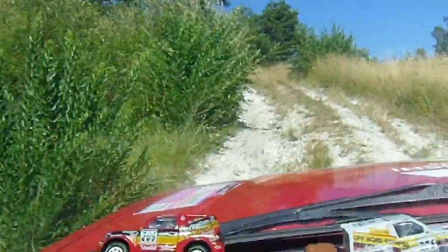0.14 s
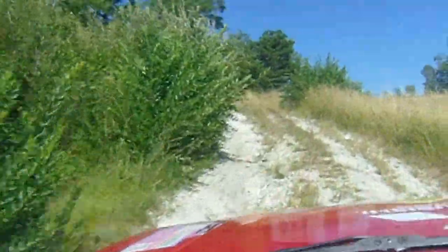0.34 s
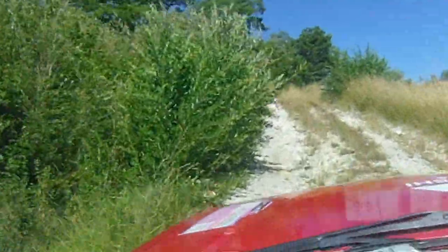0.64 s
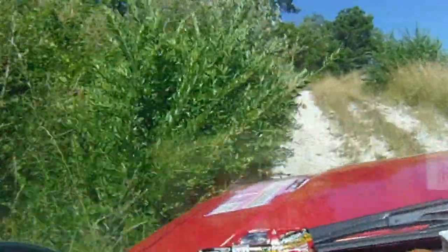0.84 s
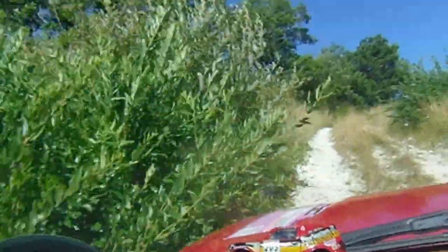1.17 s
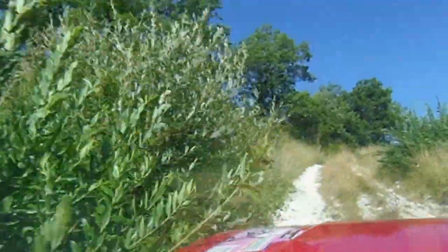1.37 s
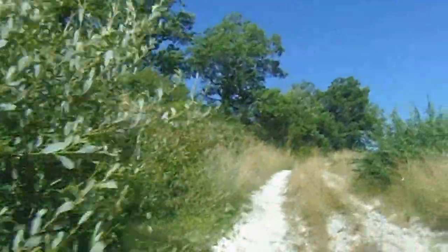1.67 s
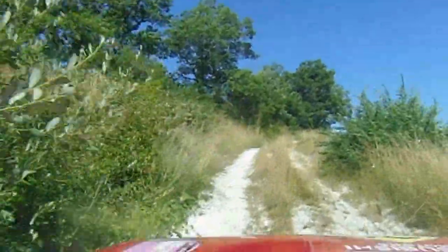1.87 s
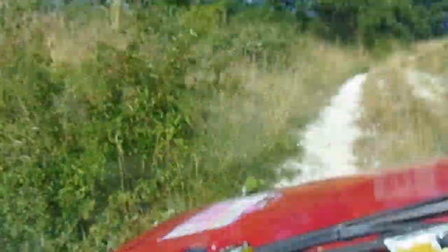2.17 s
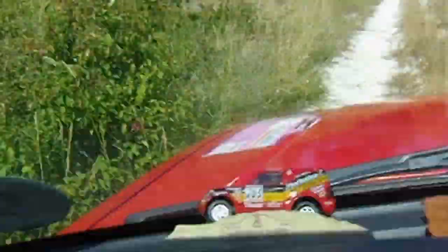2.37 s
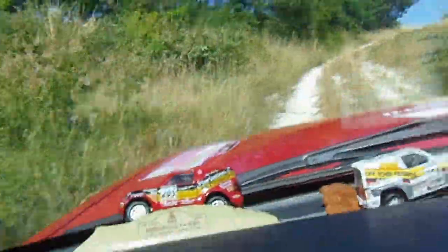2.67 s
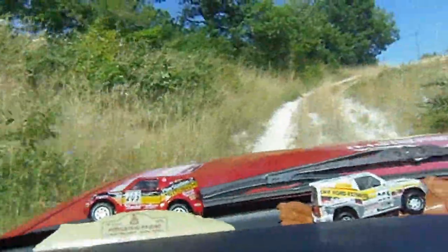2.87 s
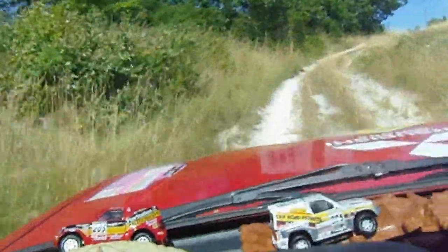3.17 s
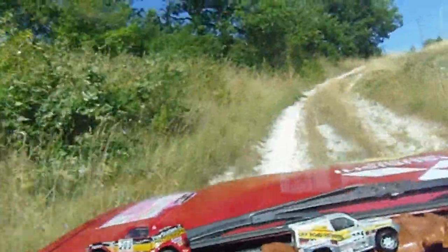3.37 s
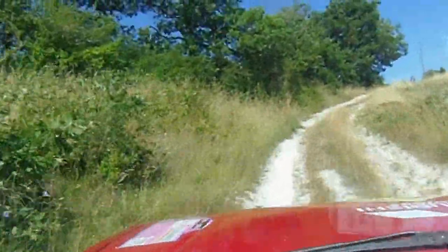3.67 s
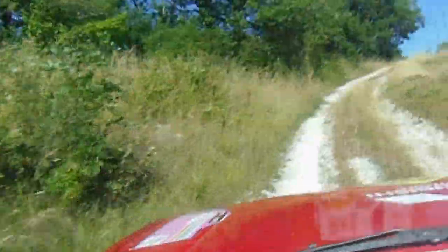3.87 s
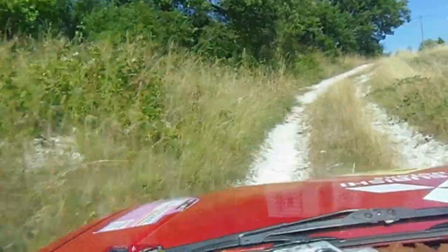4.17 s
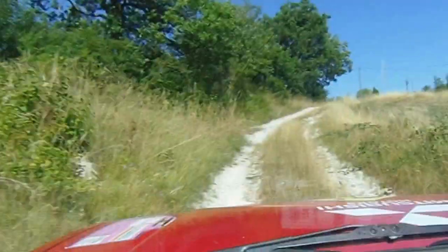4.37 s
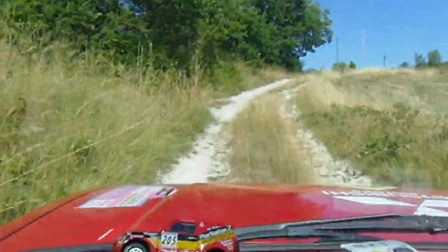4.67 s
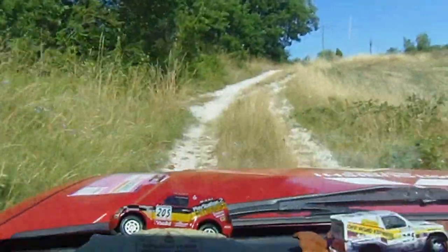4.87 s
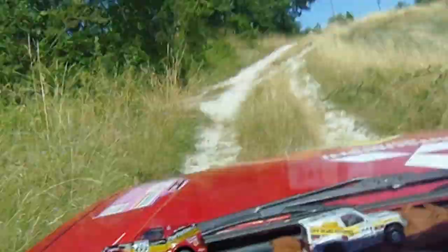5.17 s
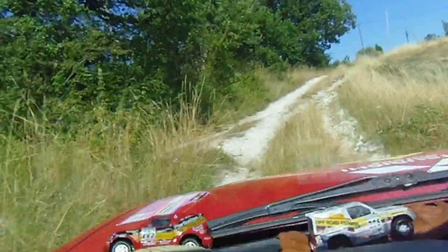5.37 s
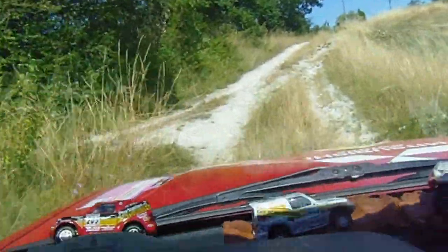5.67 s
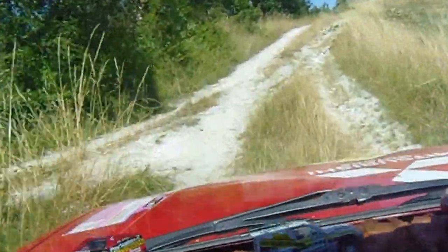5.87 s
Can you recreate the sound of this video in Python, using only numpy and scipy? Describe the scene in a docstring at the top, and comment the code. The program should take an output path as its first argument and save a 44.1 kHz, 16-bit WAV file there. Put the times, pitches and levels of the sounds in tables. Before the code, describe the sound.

Heard from inside the cab of an off-road vehicle on a rough track: a droning engine rises in pitch unevenly while deep body boom and shudder swell with every rut. Loose plastic knocks in clusters early and again midway, with dull floor thumps, fine rattles and tiny squeaks. Later the load eases, the drone softens and only light taps and small knocks remain. The sound is close, dry and single-channel.

```python
"""Inside the cab of a six-cylinder four-wheel drive climbing a rutted track. The body booms as a drifting
low mode and shudders as low noise, both raised by each rut. The exhaust hums as a harmonic series at multiples
of half the firing rate. Loose trim rattles as filtered noise, knocks as noise bursts with ringing modes, and
squeaks as short wavering tones; a clip taps as decaying noise and the floor thumps as decaying tones.
On top of the sounds in the cab lie faint clicks, each a sudden jump of the waveform that sinks back."""
import sys
import numpy as np
from scipy.fft import rfft, irfft, next_fast_len
from scipy.io import wavfile
from scipy.ndimage import uniform_filter1d, map_coordinates

SR = 44100
rng = np.random.default_rng(int(sys.argv[2]) if len(sys.argv) > 2 else 0)


def transcribe(signal):
    """Save signal, clipped to [-1, 1], as a 16-bit WAV file at the path in sys.argv[1]."""
    frames = np.atleast_2d(signal).T
    limited = np.clip(frames, -1, 1)
    pcm = np.round(limited * 32767).astype(np.int16)
    wavfile.write(sys.argv[1], SR, pcm)


N = 266364


def amp(db):
    """Decibel law: level to amplitude gain."""
    return 10 ** (np.asarray(db) / 20)


def unit(x):
    """Normalisation to an rms of 1."""
    return x / np.sqrt(np.mean(x ** 2) + 1e-20)


def curves(rows):
    """Linear interpolation over time: one value per sample for each column after the time."""
    s, *columns = np.transpose(rows)
    return [np.interp(np.arange(N) / SR, s, column) for column in columns]


def wobble(rate):
    """Smooth random modulation: a spline through normal deviates, rate knots a second."""
    knots = rng.standard_normal(int(N * rate / SR) + 4)
    return map_coordinates(knots, [np.arange(N) * rate / SR])


def filtered(x, response):
    """Linear filtering: the spectrum is multiplied by a response of frequency."""
    m = next_fast_len(N + SR // 2)
    return irfft(rfft(x, m) * response(np.fft.rfftfreq(m, 1 / SR)), m)[:N]


def coloured(x, points):
    """Spectral shaping through (Hz, dB) points on a log frequency axis, to rms 1."""
    hz, db = np.transpose(points)
    return unit(filtered(x, lambda f: amp(np.interp(np.log(f + 1), np.log(hz + 1), db))))


def noise():
    """White noise: equal mean power at every frequency."""
    return rng.standard_normal(N)


def even(x, seconds):
    """Gain levelling: swings slower than seconds are reduced, as in a steadily driven panel."""
    power = np.abs(uniform_filter1d(x ** 2, int(seconds * SR)))
    return unit(x / np.sqrt(power + 0.023))


def add_at(out, s, burst):
    """Superposition: adds a burst to out from time s."""
    out[round(s * SR):][:len(burst)] += burst


# Roughness of the track: start_s [s], thud_db [dB], drone_db [dB], rattle_db [dB]
TRACK_ROUGHNESS = [(0.0, -29, -49.5, -69.5), (0.4, -30, -46.5, -69), (0.93, -27, -44, -62.5),
                   (1.13, -29, -45, -70), (1.23, -34.5, -50.5, -70), (1.66, -37, -47, -66),
                   (1.82, -37, -50.5, -67), (2.4, -40.5, -54, -69), (2.8, -39, -52.5, -70.5),
                   (3.46, -35, -51.5, -70.5), (3.5, -31, -48.5, -71), (3.77, -35, -50, -68),
                   (4.17, -40.5, -55, -75.5), (5.1, -40.5, -54.5, -73.5), (5.43, -41.5, -56, -73.5),
                   (5.5, -39, -54, -73.5), (6.04, -40, -56.5, -74.5)]


def roughness():
    """Forced excitation: the track sets the levels of thud, drone and rattle."""
    return curves(TRACK_ROUGHNESS)


# Spectrum of the thin hiss: frequency_hz [Hz], relative level_db [dB per Hz]
HISS_SPECTRUM = [(1470, -27), (2500, -5.5), (3390, -5.5), (4500, -12), (8560, -12.5), (14200, -15.5),
                 (15600, -29)]
HISS_DB = -3  # against the smoothed rattle level, at the start
HISS_FADE_DB_PER_S = 0.94


def hiss():
    """Broadband noise: its level follows the smoothed rattle level and fades steadily against it."""
    rattle_db = roughness()[2]
    fade_db = HISS_FADE_DB_PER_S * np.arange(N) / SR
    hiss_db = HISS_DB + uniform_filter1d(rattle_db, SR // 2) - fade_db
    return amp(hiss_db) * coloured(noise(), HISS_SPECTRUM)


# Faint clicks on top of the cab's sound, small jumps of the waveform: start_s [s], level_db [dB peak]
CLICK_STEPS = [(0.444, -39), (0.972, -38.5), (1.1, -31.5), (1.116, -38), (1.132, -31.5), (1.516, -37.5),
               (1.533, -38.5), (2.156, -38.5), (2.172, -39.5), (3.82, -31.5), (3.852, -40.5),
               (3.869, -39.5), (5.964, -46.5)]
CLICK_S = 0.0033  # time constant of the decay


def clicks():
    """Step and relaxation: each click is a sudden jump of either sign that sinks back exponentially."""
    out, t = np.zeros(N + SR), np.arange(SR // 20) / SR
    for s, db in CLICK_STEPS:
        add_at(out, s, rng.choice([-1, 1]) * amp(db) * np.exp(-t / CLICK_S))
    return out[:N]


# Taps of a loose clip: start_s [s], level_db [dB, before the common trim]
CLIP_TAPS = [(4.0392, -53.5), (4.14, -58), (4.3498, -58), (4.408, -57), (4.4667, -53), (4.4956, -56),
             (4.5248, -56), (4.5761, -59.5), (4.7566, -59), (4.9212, -56), (4.9639, -56), (5.0097, -56),
             (5.0559, -65), (5.1731, -55), (5.3703, -59), (5.5194, -62), (5.5696, -59)]
CLIP_SPECTRUM = [(700, -30.5), (2300, -1.5), (5500, -12), (12000, -25.5)]
TAP_T60_S = .03


def taps():
    """Light impact: a loose clip of thin plastic gives short bursts of decaying noise."""
    shape, t = np.zeros(N + SR), np.arange(SR // 20) / SR
    rise = 1 - np.exp(-t / 0.0016)
    for s, db in CLIP_TAPS:
        add_at(shape, s, amp(db - 3.5 - 60 * t / TAP_T60_S) * rise)
    return shape[:N] * coloured(noise(), CLIP_SPECTRUM)


# Rubbing trim: start_s [s], pitch_hz [Hz], level_db [dB, before a common gain], length_s [s, before stretching]
TRIM_SQUEAKS = [(0.744, 5160, -66, 0.013), (1.288, 5780, -58.5, 0.0058), (1.384, 5692, -64, 0.011),
                (1.656, 5910, -53, 0.0054), (1.987, 5680, -70, 0.0092), (2.054, 5500, -66, 0.0094),
                (2.353, 5650, -72, 0.018), (2.48, 5700, -73, 0.013), (3.518, 8560, -64, 0.013),
                (3.543, 2540, -51, 0.0079), (3.558, 8520, -63, 0.0094), (3.559, 4400, -64, 0.018),
                (3.563, 9960, -60, 0.0083), (3.581, 8890, -50.5, .008), (3.585, 10400, -61.5, 0.014),
                (3.615, 7900, -67, .008), (3.631, 8630, -68, 0.0075), (3.643, 4700, -67, 0.01),
                (3.649, 8940, -61.5, 0.0067), (3.722, 5740, -73, 0.015), (3.939, 5660, -63.5, 0.014),
                (4.364, 5680, -73.5, 0.019), (5.231, 2342, -69.5, 0.0064), (5.288, 2340, -66, 0.0056)]
SQUEAK_WAVER = 0.047  # radians a sample up to 6 kHz, more for higher squeaks


def squeaks():
    """Stick-slip friction: brief tones that start sharply and waver in pitch."""
    out = np.zeros(N)
    for s, hz, db, length in TRIM_SQUEAKS:
        t = np.arange(int(1.87 * length * SR)) / SR
        waver = np.cumsum(rng.normal(0, SQUEAK_WAVER * max(hz / 6000, 1) ** 2, len(t)))
        envelope = np.sin(np.pi * (t / t[-1]) ** 0.45)  # peaks early
        add_at(out, s, 1.75 * amp(db) * envelope * np.sin(2 * np.pi * hz * t + waver))
    return out


# Spectrum of the rattling trim, before dull and bright parts are split: frequency_hz [Hz], level_db [dB per Hz]
TRIM_SPECTRUM = [(300, -93.5), (1100, 0.5), (1800, -3.5), (2300, -3), (2800, -4), (4000, -6), (6000, -11),
                 (10000, -18.5), (15000, -29.5)]
GRAIN_DB = 1.2  # gravel under the tyres roughens drone and rattle


def rattle(swing):
    """Repeated small contacts, dull or bright: one at each swing of the body, more at random."""
    swings = np.flatnonzero(np.diff(np.floor(swing)))
    start = np.append(swings, rng.integers(0, N, size=600))
    size, bright, lasting = rng.random((len(start), 3)).T
    t = np.arange(SR // 20) / SR
    t60 = 0.012 + 0.031 * lasting[:, None]
    puffs = amp(-4 * np.log(1 - .9 * size[:, None]) - 60 * t / t60)
    place = start[:, None] + np.arange(len(t))

    def shake(share):
        """Superposition of all contacts, weighted by share, over a steady floor."""
        weighted = (share[:, None] * puffs).ravel()
        return .62 + .55 * np.bincount(place.ravel(), weighted, N)[:N]

    source = coloured(noise(), TRIM_SPECTRUM)
    dull = filtered(source, lambda f: 1 / (1 + (f / 3500) ** 2))
    trim = unit(shake(1.2 - bright) * dull + shake(2.5 * bright ** 2) * (source - dull))
    return amp(roughness()[2] + GRAIN_DB * wobble(250)) * trim


# Blows of loose plastic: start_s [s], level_db [dB, before band trims],
# low_db and bright_db [dB, low and bright bands against level_db]
PLASTIC_BLOWS = [(0.295, -51.5, -16, -7.5), (0.3497, -47, 0, -1), (0.441, -44, 1, -9),
                 (0.4858, -35.5, -3, -16.5), (0.853, -45.5, 7, -3), (0.8978, -47, -17, -3.5),
                 (0.9965, -43, -4, -1.5), (1.0322, -41.5, 0, -5.5), (1.076, -38.5, -5, -5.5),
                 (1.0877, -40.5, -5, -16), (1.131, -46, -7, -10), (1.1776, -51, -21, -4),
                 (1.485, -44.5, -5, -7), (1.5458, -31, -3.5, 0.5), (1.5921, -29.5, 1.5, -8.5),
                 (1.6, -41, 1, -15), (1.608, -43.5, 2, -8), (1.615, -46, 3, 9), (1.783, -47.5, -1, -1),
                 (1.8036, -44.5, -5, 4.5), (2.0356, -52, -9, 0), (2.798, -53.5, -5, -4),
                 (3.1465, -54, 8.5, -14.5), (3.1641, -44.5, -4, 4.5), (3.207, -45.5, 4.5, -5),
                 (3.2507, -47.5, 3, -33), (3.5, -47, 3, -1.5), (3.5204, -46, -5, -22),
                 (3.506, -55, -3, -11), (3.5336, -35, -3.5, -1), (3.541, -46.5, 5, 1),
                 (3.5463, -43.5, 5, -5), (3.553, -41, -9, -5), (3.5833, -44, 2, -5.5),
                 (3.588, -46.5, -6, 2), (3.5975, -47, -7, -4.5), (3.615, -48, 5.5, -5),
                 (3.6556, -44, -8, -22), (3.7003, -46.5, -20, -9.5), (3.752, -50.5, -7.5, -3.5),
                 (3.984, -53, 5.5, -5), (5.2634, -56.5, 12.5, -12), (5.609, -55, 4, -6.5),
                 (5.6585, -47.5, 3, -8.5), (5.6743, -49, 3, -10), (5.692, -54, 0, -15),
                 (5.7103, -51.5, 3, -23), (5.783, -52, 7, -1.5), (5.8193, -52.5, -5, -10),
                 (5.894, -55, 6, -6), (5.968, -58, -7, -4), (5.9817, -52, -16, -14.5),
                 (6.0207, -50, -12, -13)]
# Modes of the hollow dashboard: frequency_hz [Hz, before detuning], relative level_db [dB], t60_s [s]
HOLLOW_MODES = [(650, 2.5, 0.062), (727, -2, 0.067), (820, -1.5, 0.046), (1068, -0.5, 0.026),
                (1410, -7, 0.096)]
# Modes of its hard skin: frequency_hz [Hz, before detuning], relative level_db [dB], t60_s [s]
SKIN_MODES = [(1590, -4, .045), (1735, -10, 0.036), (1990, -1.5, .03), (2220, -5.5, 0.05),
              (2470, 1.5, 0.023), (3130, -6.5, 0.015), (3333, 0, 0.023), (3940, -7, 0.018),
              (4760, -2, 0.022)]
KNOCK_T60_S = 0.044 * np.array([[1.4], [1], [.8]])  # low, middle, bright band
DETUNE = .03  # relative spread: each blow lands elsewhere and shifts the modes
HOLLOW_GROWS = 1.4  # dB of the hollow ring per dB of the blow's low part


def ringing(modes, t):
    """Modal synthesis: a sum of decaying sines, scattered in level and pitch at each blow."""
    total = np.zeros(len(t))
    for hz, level, t60 in modes:
        gain = amp(level + rng.normal(0, 2.1) - 60 * t / t60)
        phase = 2 * np.pi * hz * rng.normal(1, DETUNE) * t + rng.uniform(0, 2 * np.pi)
        total += gain * np.sin(phase)
    return total


def knocks():
    """Impact excitation: a ragged noise burst in three bands, with the dashboard's modes ringing."""
    # low, middle, bright: (Hz, relative dB)
    bands = [[(250, -39), (650, -1.5), (1300, -4.5), (4000, -90.5)],
             [(600, -97.0), (1600, 0.0), (2500, -2.5), (4500, -5.5), (12000, -62.5)],
             [(2000, -81.0), (5500, -3.5), (9500, -10.5), (12500, -12.0), (15500, -19)]]
    shape, ring, t = np.zeros((3, N + SR)), np.zeros(N + SR), np.arange(SR // 5) / SR
    rise = 1 - np.exp(-t / .0024)
    decay = amp(-60 * t / KNOCK_T60_S) + 0.048 * amp(-60 * t / 0.36)  # with a faint longer tail
    for s, db, low_db, bright_db in PLASTIC_BLOWS:
        here = slice(round(s * SR), round(s * SR) + len(t))
        band_db = [[db + low_db - 2.5], [db - 1.5], [db + bright_db]]
        shape[:, here] += amp(band_db) * decay * rise
        hollow = amp(HOLLOW_GROWS * (db + low_db + 33) - 41.5) * ringing(HOLLOW_MODES, t)
        skin = amp(db - 9.5) * ringing(SKIN_MODES, t)
        ring[here] += (hollow + skin) * rise
    parts = [coloured(noise(), band) for band in bands]
    ragged = amp(-8.0 + 2.1 * wobble(600))
    return ring[:N] + ragged * (shape[:, :N] * parts).sum(axis=0)


# An axle meets its stop: start_s [s], level_db [dB, before rise and decay]
AXLE_BUMPS = [(.49, -32), (.69, -25), (0.991, -22), (3.49, -20)]
BUMP_HZ, BUMP_T60_S = 73.2, 0.2


def bumps():
    """Damped oscillation: a dull thump through the floor."""
    out, t = np.zeros(N + SR), np.arange(SR // 3) / SR
    rise = 1 - np.exp(-t / 0.0083)
    for s, db in AXLE_BUMPS:
        add_at(out, s, amp(db - 60 * t / BUMP_T60_S) * rise * np.sin(2 * np.pi * BUMP_HZ * t))
    return out[:N]


# Engine speed: start_s [s], pitch_hz [firings of one bank, Hz], level_db [dB rms of the 2nd multiple]
ENGINE_SPEED = [(0.0, 54.3, -42), (0.12, 60.12, -30.5), (0.25, 63.8, -37.5), (0.47, 65.18, -36.5),
                (0.54, 66.9, -39.5), (0.67, 71.34, -34), (0.78, 73.5, -34.5), (0.94, 73.75, -29.5),
                (1.13, 72.2, -40.5), (1.41, 79.5, -34.5), (1.65, 75.04, -43.5), (2.0, 80.2, -37),
                (2.25, 77.22, -43.5), (2.62, 83.85, -37.5), (2.86, 83.84, -38.5), (3.11, 89.07, -36.5),
                (3.4, 88.6, -37), (3.6, 95.6, -38), (3.78, 87.3, -42), (3.9, 93.9, -42), (4.16, 89.8, -43),
                (4.31, 93.65, -43), (4.54, 90.5, -40.5), (4.78, 91.83, -38.5), (4.96, 90.5, -40),
                (5.25, 91.85, -41.5), (5.43, 89.8, -44), (5.63, 90.56, -46.5), (5.8, 85.6, -53),
                (6.04, 85.3, -50)]
# Pull on the engine: start_s [s], load_db [dB against full load]
ENGINE_LOAD = [(0, -2), (1.1, 1.5), (1.4, -12.5), (1.55, -4.5), (2.0, -17.5), (2.5, -7), (3.6, -21),
               (4.45, -28.5), (4.75, -17.5), (5.55, -26), (5.8, -31), (6.04, -46)]
# Multiples at full load by engine speed: pitch_hz [firings of one bank, Hz], level_db [dB rms]
THIRD_MULTIPLE = [(54, -58), (60, -40), (63.5, -34.5), (66, -38.5), (72, -45), (75, -46), (79, -56.5),
                  (84, -52), (95, -53.5)]
FOURTH_MULTIPLE = [(54, -48), (66, -53), (72, -54), (75, -53), (78, -61.5), (81, -56), (84, -51),
                   (86, -51.5), (89, -51.5), (92, -64.5), (96, -52)]
FIFTH_MULTIPLE = [(54, -63), (64, -56.5), (70, -71), (77, -73.5), (84, -77.5), (89, -58.5), (91, -51.5),
                  (96, -58.5)]
# Growth of the 3rd, 4th and 5th multiples with load: growth [dB per dB]
LOAD_GROWTH = [0.9, 0.45, 0.43]
# Weak lines of uneven cylinders: multiple [of the firings of one bank], level_db [dB rms at full load]
UNEVEN_LINES = [(2 / 3, -43.5), (0.99, -48.5), (4 / 3, -52.5), (8 / 3, -57.5), (11 / 3, -62.5), (6, -68.5)]
FLUTTER_DB = 1.3  # the higher multiples come and go


def engine():
    """Harmonic series of the exhaust, slightly unsteady; uneven cylinders add weak lines that grow with load."""
    hz, level_db = curves(ENGINE_SPEED)
    load_db, = curves(ENGINE_LOAD)
    turn = 2 * np.pi * np.cumsum(hz) / SR + 0.081 * wobble(30)

    def tone(multiple, db):
        """A sine of the given rms level, locked to the engine's phase."""
        gain = np.sqrt(2) * amp(db + 0.12 * wobble(25))
        return gain * np.sin(multiple * turn + rng.uniform(0, 2 * np.pi))

    hum = tone(2, level_db)
    tables = [THIRD_MULTIPLE, FOURTH_MULTIPLE, FIFTH_MULTIPLE]
    for multiple, (table, growth) in enumerate(zip(tables, LOAD_GROWTH), start=3):
        full_load_db = np.interp(hz, *np.transpose(table))
        hum += tone(multiple, full_load_db + growth * load_db + FLUTTER_DB * wobble(11))
    for multiple, db in UNEVEN_LINES:
        hum += tone(multiple, db + 0.57 * load_db)
    return hum, turn


# Spectrum of the drone: frequency_hz [Hz], relative level_db [dB per Hz]
DRONE_SPECTRUM = [(120, -10), (210, -2.5), (238, -7.5), (315, -8.5), (364, -12), (590, -20.5), (635, -16.5),
                  (690, -24), (745, -20.5), (800, -26.5), (869, -26.5), (964, -25), (2500, -38.5),
                  (3250, -65.5), (5500, -120)]


def drone(turn):
    """Amplitude modulation: the engine's firing pulses in a noise drone."""
    firing = 1 + 0.17 * np.cos(2 * turn)
    drone_db = roughness()[1] + 0.78 * wobble(13) + GRAIN_DB * wobble(120)
    return amp(drone_db) * coloured(firing * noise(), DRONE_SPECTRUM)


# Spectrum of the thud: frequency_hz [Hz], relative level_db [dB per Hz]
THUD_SPECTRUM = [(30, -8.5), (50, 10.5), (80, -2), (120, -4.5), (200, -11), (260, -41), (400, -89.5),
                 (700, -130)]
THUD_WITH_SHUDDER = 0.09  # dB per dB


def thud(shudder_gain):
    """Low-frequency noise, driven by the track's roughness and slightly by the shudder."""
    thud_db = roughness()[0] + 1.4 * wobble(9.3)
    gain = amp(thud_db) * (shudder_gain / shudder_gain.mean()) ** THUD_WITH_SHUDDER
    return gain * even(coloured(noise(), THUD_SPECTRUM), seconds=0.17)


# A wheel works through a rut: start_s [s], end_s [s], boom_db [dB], shudder_db [dB, before a common trim]
WHEEL_RUTS = [(0.077, 0.158, -43, -22.5), (0.186, 0.289, -21.5, -24.5), (0.359, 0.453, -13.5, -22),
              (0.439, 0.619, -18, -18.5), (0.654, 0.75, -28, -25.5), (0.785, 0.904, -15, -23),
              (0.921, 1.015, -12.5, -23.5), (1.038, 1.151, -10, -30), (1.164, 1.37, -24, -35),
              (1.389, 1.478, -15, -24), (1.47, 1.581, -12.5, -27.5), (1.643, 1.751, -18, -15.5),
              (1.842, 2.092, -17.5, -24), (2.092, 2.196, -12, -22.5), (2.325, 2.687, -21, -30.5),
              (2.751, 2.85, -51, -26.5), (2.992, 3.281, -23.5, -32), (3.317, 3.464, -24, -40.5),
              (3.51, 3.605, -15.5, -19), (3.664, 3.763, -13.5, -23), (3.77, 3.91, -11, -29.5),
              (3.935, 4.158, -19.5, -28), (4.169, 4.547, -27.5, -31), (4.804, 5.047, -22.5, -37.5),
              (5.184, 5.33, -21.5, -38.5), (5.463, 5.576, -19.5, -26), (5.592, 5.831, -18.5, -24),
              (5.879, 6.031, -22.5, -41)]
CALM_DB, CALM_SHUDDER_DB = -30.5, -31.5  # boom and shudder between ruts
EDGE_S = 0.047  # rise and fall of a rut


def ruts():
    """Power addition: each rut rises, holds and falls over a calm level of boom and shudder."""
    t = np.arange(N) / SR
    power = amp(2 * np.array([[CALM_DB], [CALM_SHUDDER_DB]])) * np.ones(N)
    for start, end, *levels_db in WHEEL_RUTS:
        shape = np.clip(np.minimum(t - start, end - t) / EDGE_S + .5, 0, 1) ** 2
        power = power + amp(2 * np.array(levels_db))[:, None] * shape
    return np.sqrt(power)


# Spectrum of the shudder: frequency_hz [Hz], relative level_db [dB per Hz]
SHUDDER_SPECTRUM = [(5, -3), (9, -2), (14, -3), (22, 3.5), (29, 8.5), (38, 7), (50, -6.5), (70, -20.5),
                    (100, -70), (160, -130)]


def shudder(shudder_gain):
    """Forced vibration: ruts shake the panels, heard as levelled low noise."""
    return amp(0.5) * shudder_gain * even(coloured(noise(), SHUDDER_SPECTRUM), seconds=0.11)


# Lowest mode of cab air and body: start_s [s], pitch_hz [Hz, before random drift]
BOOM_PITCH = [(0, 19), (0.3, 19), (0.45, 21.5), (0.9, 20.5), (1.1, 19), (1.5, 20), (1.9, 20), (2.15, 18.5),
              (2.6, 19.5), (3.2, 20), (3.4, 17), (3.55, 19.5), (3.85, 19), (4.3, 18.5), (4.95, 18),
              (5.3, 21), (5.5, 20), (5.72, 23), (5.9, 16.5), (6.04, 15.7)]
DRIFT_HZ = 0.901  # scale of the random drift


def body_swing():
    """Phase accumulation: cycles of the lowest mode, its pitch drifting at random."""
    return np.cumsum(curves(BOOM_PITCH)[0] + DRIFT_HZ * wobble(12)) / SR


def boom(swing, boom_gain):
    """Cavity resonance: the cab booms at its lowest mode, louder in each rut."""
    return np.sqrt(2) * boom_gain * amp(.8 * wobble(16)) * np.sin(2 * np.pi * swing)


def scene():
    """Superposition of the cab's sources, without reverberation, and the faint clicks on top."""
    hum, turn = engine()
    swing = body_swing()
    boom_gain, shudder_gain = ruts()
    light = hiss() + taps() + squeaks()
    loose = rattle(swing) + knocks() + bumps()
    body = drone(turn) + thud(shudder_gain) + shudder(shudder_gain) + boom(swing, boom_gain)
    cab = light + loose + hum + body
    return (cab + clicks())[None]


TOP_HZ = 15708  # nothing passes from here up


def record(dry):
    """Low-pass filtering: a slope above 14.9 kHz and a sharp cutoff, around the line joining the two ends."""
    offset = np.linspace(dry[0, 0], dry[0, -1], N)

    def response(hz):
        """9 dB lower per kHz on the slope."""
        return (hz < TOP_HZ) * amp(-9 * np.clip(hz / 1000 - 14.9, 0, None))

    return (offset + filtered(dry[0] - offset, response))[None]


dry = scene()
out = record(dry)
transcribe(out)
```